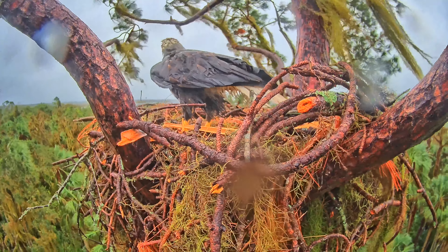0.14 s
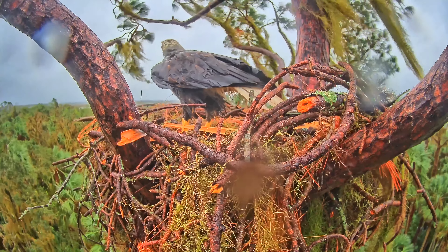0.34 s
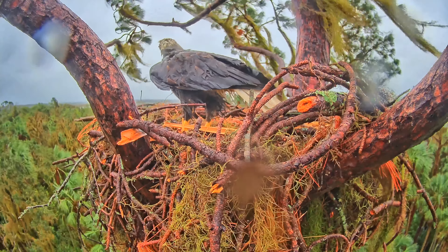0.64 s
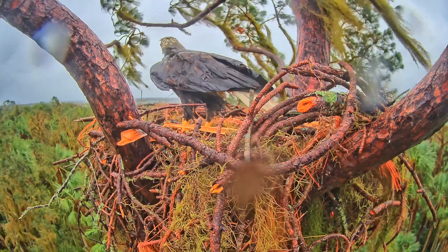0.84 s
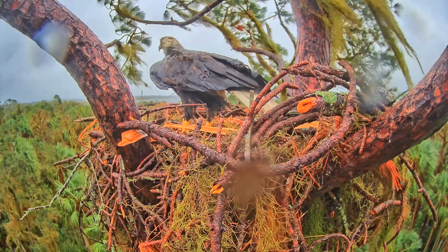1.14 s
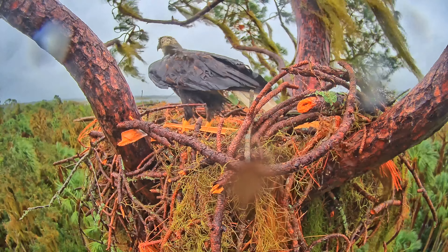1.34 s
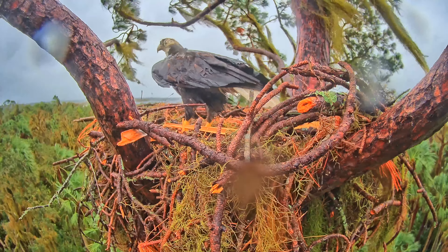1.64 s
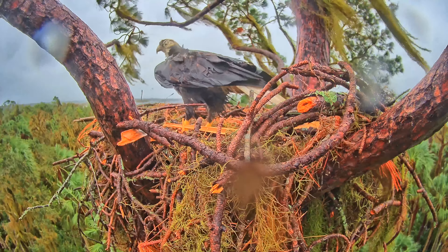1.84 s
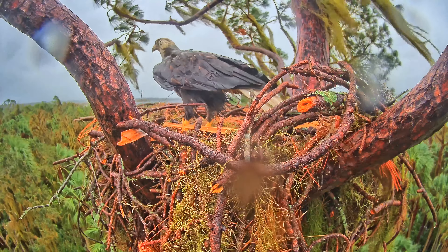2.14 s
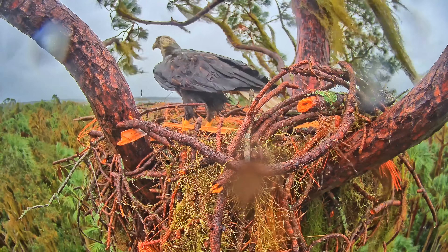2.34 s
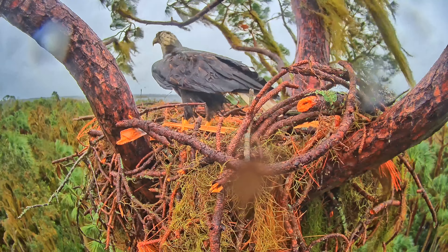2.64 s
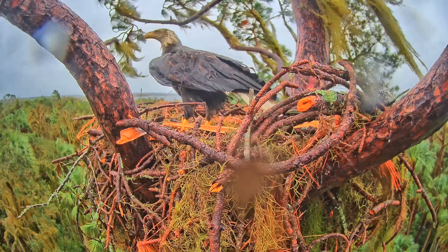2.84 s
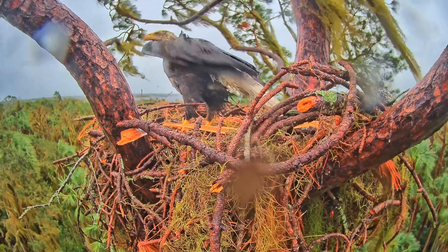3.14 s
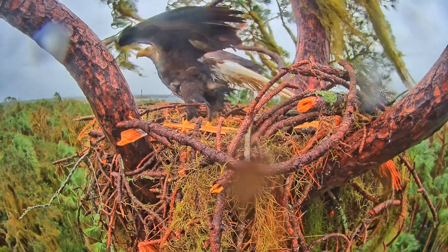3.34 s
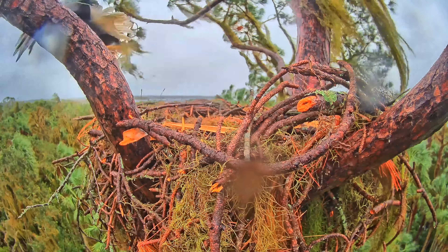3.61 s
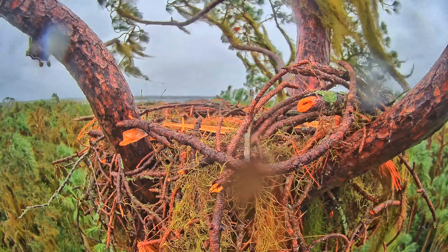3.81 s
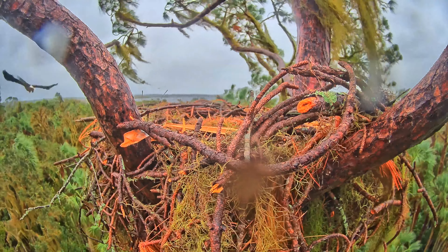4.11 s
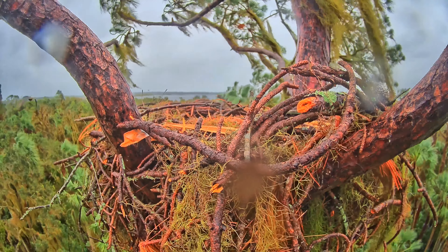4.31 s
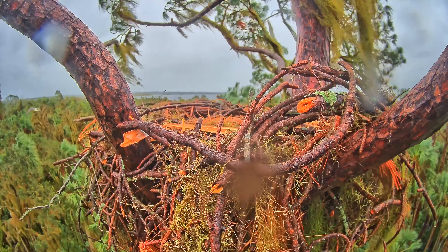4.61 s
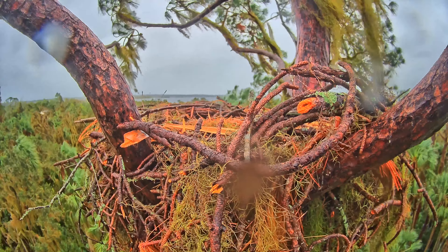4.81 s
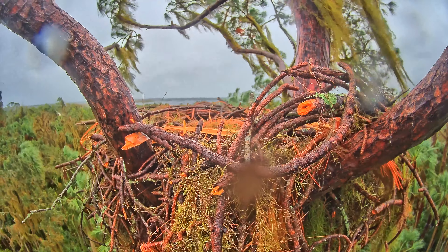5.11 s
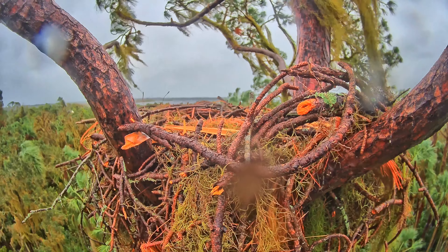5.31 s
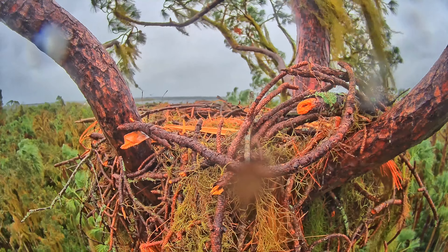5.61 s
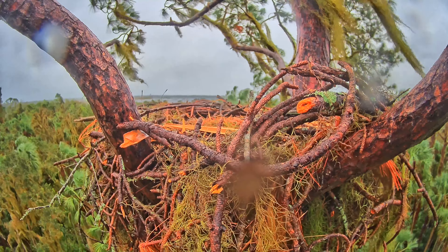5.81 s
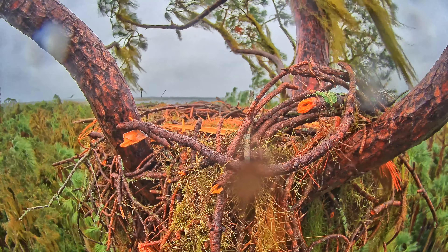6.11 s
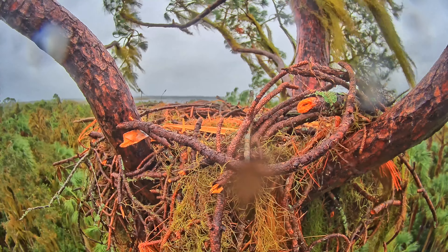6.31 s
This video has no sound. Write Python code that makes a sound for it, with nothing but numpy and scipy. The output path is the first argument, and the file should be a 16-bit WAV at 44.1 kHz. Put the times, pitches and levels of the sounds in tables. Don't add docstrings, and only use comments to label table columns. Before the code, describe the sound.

Heavy gusts buffet and crackle against a microphone high in a pine, with hollow hoots, a brief lull, and faint needle hiss behind.

```python
import sys
import numpy as np
from scipy import signal
from scipy.fft import rfft, irfft
from scipy.io import wavfile
from scipy.ndimage import uniform_filter1d

SR = 44100
rng = np.random.default_rng(int(sys.argv[2]) if len(sys.argv) > 2 else 0)


def amplitude_ratio(level_db):
    exponent = np.asarray(level_db, float) / 20
    return 10 ** exponent


def dump_mix(stems):
    frames = np.atleast_2d(stems).T
    limited = np.clip(frames, -1, 1)
    pcm = np.round(limited * 32767).astype(np.int16)
    wavfile.write(sys.argv[1], SR, pcm)


N = 284489
TIME = np.arange(N) / SR

# (time [s], hiss level [dB])
NEEDLE_SWAY = [(0, -65), (.6, -66), (.82, -62), (1.15, -64.5), (1.6, -59.5), (2.6, -62.5), (3.8, -61.5),
               (4.05, -61), (4.3, -66), (4.9, -68.5), (5.28, -59.5), (5.7, -68.5), (6.45, -69)]
# (frequency [Hz], level [dB per Hz])
NEEDLE_COLOUR = [(3000, -6), (4940, -17), (6720, -5), (8500, -12.5), (10200, -30.5), (16000, -47)]
# (time [s], bright top level [dB], body level [dB])
FEATHER_SHAKES = [
    (2.1702, -64, -61),
    (2.191, -56, -47.5),
    (2.2899, -61, -54),
    (2.333, -62, -51),
    (2.386, -68, -53),
    (2.4176, -69, -53.5),
]

# (time [s], level [dB], length [ms], pitch [Hz])
EDGE_TONES = [(0.495, -36, 14.0, 2630), (0.531, -33, 11.0, 2200), (0.804, -29, 30, 1720),
              (0.819, -23.5, 13.0, 3100), (0.82, -31, 17.0, 2540), (0.861, -24.5, 10.0, 2840),
              (1.091, -35, 29.0, 1850), (1.221, -31.5, 10.0, 2280), (1.835, -41, 12.0, 1510),
              (2.065, -39, 12.0, 2330), (2.068, -37.5, 15.0, 3400), (2.966, -33, 12.0, 1250),
              (3.096, -35.5, 30, 1590), (3.126, -34, 11.0, 2970), (3.193, -35, 17.0, 2020),
              (3.227, -36, 14.0, 1720), (3.265, -38, 30, 2670), (3.289, -32.5, 30, 2760),
              (3.304, -28, 13.0, 1250), (3.53, -37.5, 19.0, 2280), (3.65, -31.5, 14.0, 990),
              (3.762, -30.5, 19.0, 2840), (3.934, -36, 30, 2800), (3.961, -33, 15.0, 1120),
              (4.016, -42, 20.0, 1340), (4.017, -24.5, 17.0, 2890), (4.061, -28.5, 20, 2934),
              (4.312, -42, 21.0, 2760), (4.345, -29, 13.0, 1080), (4.449, -38.5, 30, 2930),
              (4.564, -32.5, 15.0, 1770), (4.56, -28.5, 12.0, 3010), (5.063, -39, 10.0, 1160),
              (5.332, -42.5, 17.0, 2800), (5.373, -31, 20, 303), (5.407, -38.5, 13.0, 2760),
              (5.5, -43, 15.0, 2630), (5.739, -38, 10.0, 1160), (6.369, -41, 11.0, 2330)]
EDGE_WANDER = 0.0477
# (time [s], level [dB])
CRACKS = [(0.0215, -35), (.057, -54), (.081, -48), (.138, -56), (.242, -57), (.475, -54), (0.662, -42),
          (0.697, -47), (0.755, -40), (.832, -41), (.943, -57), (1.003, -45), (1.072, -53), (1.099, -51.5),
          (3.264, -46), (3.976, -47), (4.004, -49), (4.03, -47), (4.048, -54), (4.297, -48), (4.459, -54),
          (4.602, -59), (4.685, -56), (4.756, -60)]
# (frequency [Hz], level [dB per Hz])
CRACK_COLOUR = [(1500, -4), (3000, 13.5), (6000, -17), (11000, -5), (16500, -20)]
CRACK_MS = 2

# (time [s], level [dB], length [ms])
HOOTS = [(0.034, -15, 4.9), (0.216, -13.5, 5.7), (3.251, -23.5, 19), (0.729, -25, 7.6), (0.861, -18, 7.5),
         (1.255, -23, 8.2), (1.427, -27, 6), (1.628, -25, 16), (5.271, -31.5, 11), (5.508, -30.5, 7.5),
         (3.365, -23, 5.6), (2.451, -25.5, 8.5), (3.014, -18, 8.3), (3.055, -24.5, 17), (3.329, -16.5, 5.2),
         (3.388, -29, 7.8), (3.58, -23.5, 13), (3.934, -19, 13), (4.005, -24.5, 25), (4.309, -18, 16),
         (4.471, -26, 10), (3.161, -31, 8.2), (4.675, -25, 9.1), (4.751, -22, 4.4), (3.097, -32, 7.3),
         (5.624, -30.5, 6.7), (5.702, -26.5, 12), (5.796, -33, 38), (6.135, -37.5, 46), (6.261, -25.5, 11),
         (6.301, -24.5, 8.2), (6.429, -24, 15.5)]
CAVITY_HZ, CAVITY_WIDTH_HZ = 616, 80
HUM_DB, HUM_FOLLOWS, HUM_PER_WHISTLE = -51, 0.97, -0.24
HOOT_STIR_DB, HOOT_JET_DB = -17, -23.5

# (time [s], level [dB], length [ms])
TUMBLES = [(0.022, -17.5, 30), (0.084, -17, 13), (0.108, -27, 9), (0.13, -34, 11), (0.217, -14, 23),
           (0.474, -21, 15), (0.535, -28, 9.8), (0.568, -28, 31), (0.763, -33, 26), (0.906, -23, 21),
           (1.372, -34, 6.8), (1.858, -34, 12), (1.893, -31, 12), (1.939, -29, 8.3), (1.969, -30, 20),
           (2.058, -25.5, 12), (2.355, -31, 13), (2.451, -27, 10), (2.701, -21.5, 14), (3.049, -23, 25),
           (3.505, -26, 9), (3.639, -24.5, 15), (3.778, -23, 13), (4.014, -31, 21), (4.297, -13.5, 10),
           (4.407, -27, 13), (4.678, -22.5, 17), (4.758, -24, 29), (4.82, -34, 7.4), (5.03, -30, 8.2),
           (5.404, -36, 11), (5.662, -20.5, 14), (5.818, -22.5, 19)]
# (frequency [Hz], level [dB per Hz])
ROAR_COLOUR = [(90, -33), (180, -2), (330, 0), (470, -4.5), (700, -13), (1200, -22)]
ROAR_DB, ROAR_PER_PUSH, ROAR_PER_JET, ROAR_PER_SHARPNESS = -42, 0.68, 0.077, 0.062
ROAR_FULL_DB = -24
CALM_PUSH_DB, CALM_JET_DB, CALM_SHARPNESS_DB = -30, -45, -22

# (time [s], jet level [dB], whistle above throat [dB], sharpness of the edge flow [dB])
WIND = [(0, -33, -1, 9), (.12, -31.5, -13.5, -65), (.28, -43.5, -12, 0), (.44, -44, -12, -25),
        (.56, -38, -3, -8.5), (.82, -32, 0.5, -0.5), (1.15, -37.5, 0.5, -9.5), (1.4, -52.5, -0.5, -43),
        (2.25, -60, 13.5, -0.5), (2.75, -47, -14.5, -20), (3.0, -41, -4.5, -39), (3.24, -28.5, -6.5, -18),
        (3.45, -38, -5, -34), (3.95, -41, 5.5, -16), (4.4, -37.5, -3, -15), (4.75, -52, -3, -1.5),
        (5.2, -58.5, -9.5, -24), (6.45, -48, -10, -42)]
# (time [s], level [dB], length [ms], whistle above throat [dB])
PUFFS = [(.071, -27.5, 97, -2.5), (0.226, -31.5, 19.5, -19), (0.488, -32.5, 38, 10), (0.531, -28, 19, 14),
         (0.629, -28, 11.4, -13), (0.735, -37.5, 35, 25), (0.804, -31.5, 122, 24), (1.03, -34.5, 49, 8),
         (1.09, -31.5, 17, -15), (1.225, -25.5, 12, 6), (1.635, -43, 63, -11), (1.833, -41.5, 61, -3),
         (2.068, -36.5, 45, -2), (2.951, -33, 23, -10.5), (3.267, -28.5, 29, 1), (3.307, -29.5, 10, -5),
         (3.51, -38, 48, -22), (3.77, -22.5, 37.6, -1), (3.895, -36, 12, 44), (3.949, -25, 52, -2),
         (4.019, -23, 37, 4), (4.057, -39.5, 44, 52), (4.308, -24.5, 26.4, 1), (4.351, -27, 29, -8),
         (4.446, -42, 17, -25), (5.401, -37, 19, -9), (5.498, -40.5, 36, -4), (5.816, -44, 40, -17),
         (6.138, -46.5, 39, -14), (6.43, -39, 18, 6)]
# (time [s], level [dB], length [ms], whistle above throat [dB])
SPITS = [(.022, -18.5, 8.5, -11), (.139, -43, 8, 0), (0.2, -34, 15, 4), (0.676, -31, 8.4, 7),
         (0.702, -24, 5.4, 22), (0.778, -21, 7.7, -2), (0.844, -15.5, 3.7, 16), (0.862, -22, 12.6, 7),
         (0.912, -27, 1.5, 19), (0.998, -42, 25, 0), (1.374, -42, 8.5, -6), (2.868, -42.5, 3.2, 27),
         (3.16, -34, 16, -8), (3.191, -29.5, 10, -24), (3.785, -15, 4, -17), (4.185, -39, 24, 24),
         (4.47, -35.5, 8.2, 31), (4.556, -35, 15, 17), (4.634, -35, 3.3, -8), (4.677, -34.5, 14.7, 4),
         (4.744, -38, 3.3, -35), (4.766, -19, 3.4, 2), (4.847, -36.5, 9.4, 14), (4.912, -37, 14, -4),
         (5.063, -29.5, 2.3, -16), (5.283, -48, 46, 28), (5.34, -31.5, 5.5, -11.5), (5.625, -42, 8.6, -27),
         (5.665, -35.5, 3.7, -12), (6.37, -35, 7.4, -10)]
# (time [s], level [dB], length [ms])
WISPS = [(.054, -34.5, 58), (0.79, -35, 4.3), (.889, -41, 23), (.947, -33, 6.7), (0.962, -24, 2),
         (1.138, -43, 30), (1.257, -42.5, 34), (1.455, -48.5, 36), (3.125, -36, 38), (3.328, -40, 15),
         (4.597, -46, 10), (4.754, -28, 1.4), (4.819, -36, 3), (4.998, -37, 3.4), (5.156, -37, 6.5),
         (5.561, -37, 10), (5.705, -51, 22), (5.961, -50, 34), (6.303, -46, 4.5)]
# (frequency [Hz], level [dB per Hz])
THROAT_COLOUR = [(300, 6), (520, -3), (760, -2), (1080, 0), (1700, -7.5), (2400, -18.5), (3500, -65)]
# (frequency [Hz], level [dB per Hz])
WHISTLE_COLOUR = [(1200, 3), (1900, 1), (2400, 2), (2880, 6), (3400, -3), (4200, -11.5), (6000, -32)]
# (frequency [Hz], level [dB per Hz])
FIZZ_COLOUR = [(3000, -13), (4500, -2.5), (6640, -5.5), (10000, -21), (16000, -35)]
FIZZ_DB, FIZZ_PER_WHISTLE, FIZZ_PER_LEVEL = -1, 0.022, -0.058
SPIT_FIZZ_DB, USUAL_PUFF_DB = -5, -32

# (time [s], level [dB])
PUSH = [(0, -28.5), (.38, -32.5), (.58, -21), (1.15, -21.5), (1.45, -37.5), (1.75, -32.5), (1.88, -28),
        (2.17, -28.5), (2.27, -52), (2.62, -36), (3.3, -28.5), (3.7, -27.5), (4.38, -22.5), (4.75, -21),
        (5.07, -20), (5.2, -41), (5.95, -33), (6.2, -32.5)]
# (frequency [Hz], level [dB per Hz])
BUFFET_COLOUR = [(8, 3.5), (27, -5.5), (42, -3.5), (148, -10.5), (260, -24), (600, -41.5)]
# (time [s], peak [dB], length [ms])
THUMPS = [(0.053, -2.5, 4.3), (1.107, -13, 7.7), (1.811, -10, 15), (1.734, -18.5, 6), (2.491, -18.5, 3.9),
          (2.706, -26, 4.3), (2.983, -10.5, 12), (3.27, -8.5, 12), (3.38, -4.5, 5.3), (4.028, -5, 12),
          (4.776, -6.5, 2.6), (5.405, -15, 8.8)]
# (time [s], peak [dB], length [ms])
TUGS = [(0.024, -9, 4.2), (0.552, -5, 7), (0.71, -5.5, 26), (0.937, -6, 14), (1.333, -3.5, 6.9),
        (2.322, -20.5, 15), (1.48, -17, 10.6), (1.742, -19, 8.6), (1.88, -7, 1.8), (2.105, -8.5, 7.9),
        (2.36, -14, 11.6), (3.739, -7.5, 14), (3.89, -11.5, 6.9), (4.341, -6, 23), (4.765, -5.5, 4),
        (4.822, -9, 15), (5.38, -3, 11), (5.492, -7.5, 6), (5.667, -13.5, 11.5), (5.182, -12.5, 10.6)]
# (time [s], peak [dB], length [ms])
ROLLS = [(0.569, -9, 3), (.604, -24, 20), (0.648, -10, 6.5), (0.695, -14, 21), (.724, -14, 5.9),
         (.764, -23, 8.6), (0.836, -13, 19), (0.9, -12, 19), (0.959, -10.5, 14), (1.01, -9.5, 16),
         (1.037, -9, 9.7), (1.156, -14, 12), (1.353, -19, 6.5), (2.041, -18, 5), (2.12, -14, 8),
         (3.293, -10, 6.9), (3.352, -13, 15), (3.474, -13, 15), (3.857, -10.5, 7.8), (3.869, -8.5, 11),
         (4.143, -14, 22), (4.194, -15, 17), (4.262, -12, 15), (4.352, -13, 27), (4.432, -13, 24),
         (4.488, -7, 20), (4.526, -8, 11), (4.646, -16, 21), (4.742, -10, 6), (4.831, -11, 18),
         (4.861, -23, 18), (4.892, -11, 27), (4.953, -21, 15), (4.997, -16, 12), (5.055, -16, 23),
         (5.078, -12, 15), (5.108, -10, 9.1)]
# (time [s], peak [dB], length [ms])
TROUGHS = [(0.013, -18, 4.9), (.623, -18, 9.4), (0.664, -13, 50), (0.758, -5, 6.4), (.77, -10, 8.4),
           (0.822, -10, 15), (0.98, -12, 18), (1.026, -17, 12), (1.123, -12.5, 13), (1.244, -15, 16),
           (2.024, -11, 24), (2.053, -11, 11), (3.206, -11.5, 22), (3.287, -11.5, 30), (3.344, -10, 8.1),
           (3.422, -15.5, 9.2), (3.496, -11, 4.5), (3.686, -11.5, 17), (3.798, -10, 13), (3.95, -7, 9.7),
           (3.997, -12, 9.8), (4.036, -9, 34), (4.088, -17, 15), (4.178, -12.5, 13), (4.292, -14, 16),
           (4.401, -9.5, 12), (4.482, -7.5, 7.2), (4.513, -6, 20), (4.543, -8.5, 8.4), (4.583, -5.5, 14),
           (4.632, -12, 13), (4.658, -11, 16), (4.697, -7.5, 17), (4.753, -11, 9.8), (4.792, -7.5, 17),
           (4.84, -7.5, 12), (4.871, -8, 24), (4.907, -7.5, 10.3), (4.973, -16.5, 13), (5.035, -19, 11),
           (5.094, -11, 15)]
ORDERLY = 2.4
# (start [s], length [ms])
BLANKS = [(0.17, 7), (0.54, 12.6), (.558, 3), (0.686, 7.6), (0.741, 11), (0.898, 4), (0.93, 4.1),
          (0.965, 15.5), (1.194, 20), (1.388, 13), (1.985, 4.3), (2.011, 12), (2.033, 7.3), (2.109, 4.6),
          (2.88, 6), (2.906, 11), (2.986, 5.7), (3.438, 20), (3.862, 3.7), (4.512, 6.3), (4.608, 4.8),
          (4.635, 6.1), (4.65, 8.3), (4.902, 6.3), (5.012, 4.9), (5.049, 7.2), (5.096, 7.6), (5.162, 21)]
# (start [s], length [ms])
STALLS = [
    (2.095, 6.5),
    (4.571, 12),
    (4.688, 13),
    (4.785, 4),
    (4.831, 8.5),
    (4.877, 6.1),
    (4.922, 5.8),
    (5.022, 7.3),
]
BLANK_DB, QUICK_BLANK_DB_MS = -27, -71
PIN_PUSH_DB, PIN_WIDTH = 7.5, 1.95
PATCH_LIMIT_DB = 5


def evened(x):
    return x / np.sqrt(np.mean(x ** 2) + 1e-20)


def curve(table, column):
    rows = np.array(table)
    return np.interp(TIME, rows[:, 0], rows[:, column])


def flicker(top_hz):
    hz = np.fft.rfftfreq(N, 1 / SR)
    shape = np.exp(-(hz / top_hz) ** 2) * (hz > 3) / np.sqrt(hz + 10)
    return evened(irfft(rfft(rng.standard_normal(N)) * shape, N))


def noise(points, patchy_db, size=512):
    frames = 4 * N // size + 5
    hz = np.fft.rfftfreq(size, 1 / SR)
    a, b, patches = rng.standard_normal((frames, len(hz), 3)).T
    patches = uniform_filter1d(patches, size=4, axis=0)
    patches = evened(uniform_filter1d(patches, size=5, axis=1))
    f, level_db = np.transpose(points)
    colour_db = np.interp(np.log(hz + 1), np.log(f + 1), level_db, left=-90, right=-90)
    drift_db = min(patchy_db, PATCH_LIMIT_DB) * patches
    z = (a + 1j * b) * amplitude_ratio(colour_db[:, None] + drift_db)
    return evened(signal.istft(z, nperseg=size, noverlap=size - size // 4)[1][:N])


def nearby(s, ms):
    return slice(max(int((s - ms / 400) * SR), 0), int((s + ms / 400) * SR))


def humps(seconds, heights, lengths_ms, order=2):
    out = np.zeros(N)
    for s, height, ms in zip(seconds, heights, lengths_ms):
        near = nearby(s, ms)
        from_middle = abs(TIME[near] - s) * 2000 / max(ms, 2)
        out[near] += height * .5 ** from_middle ** order
    return out


def signed(pushes, pulls):
    s, peak_db, ms = np.transpose(pushes + pulls)
    return s, amplitude_ratio(peak_db) * np.repeat([1, -1], [len(pushes), len(pulls)]), ms


def distance():
    colour = [(600, -11), (2000, -3.0), (4200, -10.5), (5000, -58), (10000, -34.5), (15500, -26)]
    return amplitude_ratio(-63.0) * noise(colour, patchy_db=8.0)


def tree():
    s, top_db, body_db = np.transpose(FEATHER_SHAKES)
    top_swell = humps(s + .006, amplitude_ratio(top_db), 14.0 + 0 * s)
    top = top_swell * noise([(11000, -32), (14000, 2), (16500, -17)], patchy_db=5)
    body = humps(s + 0.0043, amplitude_ratio(body_db), 13.0 + 0 * s)
    hiss = amplitude_ratio(curve(NEEDLE_SWAY, column=1) + 2.6 * flicker(top_hz=90))
    return (hiss + body) * noise(NEEDLE_COLOUR, patchy_db=7) + top


def edge_tones():
    waver = evened(uniform_filter1d(rng.standard_normal((2, N)), size=70, axis=1))
    out = np.zeros(N)
    for s, level_db, ms, hz in EDGE_TONES:
        near = nearby(s, ms)
        turns = np.cumsum(hz * (1 + EDGE_WANDER * waver[0, near])) / SR
        swell = .5 ** ((TIME[near] - s) * 2000 / max(ms, 3)) ** 2
        out[near] += amplitude_ratio(level_db + 3.1 * waver[1, near]) * swell * np.sin(2 * np.pi * turns)
    return out


def cracks():
    s, level_db = np.transpose(CRACKS)
    snaps = humps(s, amplitude_ratio(level_db + 12.5), CRACK_MS + 0 * s)
    return snaps * noise(CRACK_COLOUR, patchy_db=-2, size=256)


def cavity(lumps):
    s, level_db, ms = np.transpose(HOOTS)
    hum_db = HUM_DB + HUM_FOLLOWS * (curve(WIND, column=1) - CALM_JET_DB)
    steady = amplitude_ratio(hum_db + HUM_PER_WHISTLE * curve(WIND, column=2))
    throb = flicker(top_hz=60)
    hum = steady * amplitude_ratio(2 * lumps + 3 * throb)
    drive = hum + humps(s, amplitude_ratio(level_db - 6.0), 1.24 * ms) * amplitude_ratio(0.43 * throb)
    turn = np.exp(2j * np.pi * CAVITY_HZ * TIME)
    r = np.exp(-np.pi * CAVITY_WIDTH_HZ / SR)
    ring = signal.lfilter([1], np.convolve([1, -r], [1, -r]), rng.standard_normal(N) / turn)
    return drive * evened((turn * ring / (abs(ring) + 1e-9) ** 0.32).real)


def roar(lumps, eddies):
    stir_db = ROAR_PER_PUSH * (np.minimum(curve(PUSH, column=1), ROAR_FULL_DB) - CALM_PUSH_DB)
    stir_db = stir_db + ROAR_PER_JET * (curve(WIND, column=1) - CALM_JET_DB)
    stir_db = stir_db + ROAR_PER_SHARPNESS * (curve(WIND, column=3) - CALM_SHARPNESS_DB)
    level = amplitude_ratio(ROAR_DB + stir_db) * evened(amplitude_ratio(5.8 * np.tanh(1.65 * lumps)))
    level = level + 0.042 * uniform_filter1d(abs(eddies), size=300)
    s, level_db, ms = np.transpose(HOOTS)
    level = level + humps(s, amplitude_ratio(level_db + HOOT_STIR_DB), 0.45 * ms)
    s, level_db, ms = np.transpose(TUMBLES)
    level = level + humps(s, amplitude_ratio(level_db - 8.0), 0.82 * ms)
    tumbling = noise(ROAR_COLOUR, patchy_db=3.0, size=1024)
    return level * evened(tumbling / uniform_filter1d(tumbling ** 2, size=1200) ** 0.28)


def jet():
    wisps = [(*row, np.interp(row[0], TIME, curve(WIND, column=2))) for row in WISPS]
    s, level_db, ms, bright_db = np.transpose(PUFFS + SPITS + wisps)
    spit = np.isin(s, np.transpose(SPITS)[0])
    fizz_db = FIZZ_DB + np.interp(s, TIME, curve(WIND, column=3))
    fizz_db = fizz_db + FIZZ_PER_WHISTLE * bright_db + SPIT_FIZZ_DB * spit
    fizz_db = fizz_db + FIZZ_PER_LEVEL * (level_db - USUAL_PUFF_DB)

    flutter = flicker(top_hz=352)
    coarse = evened(uniform_filter1d(flutter, size=250) - uniform_filter1d(flutter, size=1500))
    stream = amplitude_ratio(curve(WIND, column=1) + 0.5 * flicker(top_hz=60))
    bright = amplitude_ratio(curve(WIND, column=2) / 2)
    throat = stream / bright + humps(s, amplitude_ratio(level_db - bright_db / 2), ms)
    hoot_s, hoot_db, hoot_ms = np.transpose(HOOTS)
    throat = throat + humps(hoot_s, amplitude_ratio(hoot_db + HOOT_JET_DB), 2.0 * hoot_ms)
    whistle = stream * bright + humps(s + 0.0002, amplitude_ratio(level_db + 0.26 * bright_db), ms)
    fizz = amplitude_ratio(-22.5) * stream * bright + humps(s, amplitude_ratio(level_db + fizz_db), 1.05 * ms)

    snaps = (rng.random(N) < 500 / SR) * amplitude_ratio(1.4 * np.minimum(rng.exponential(1, N), 4))
    crackle = evened(amplitude_ratio(5.0 * flutter) * (1 + uniform_filter1d(snaps, size=20) * 25))
    crackle = 7 * np.tanh(crackle / 7)
    sizzle = noise(FIZZ_COLOUR, patchy_db=8.5, size=256)
    top = signal.sosfilt(signal.butter(2, 9000, "high", fs=SR, output="sos"), sizzle)
    sizzle = sizzle - top * np.exp(-(fizz * crackle / amplitude_ratio(-61.0)) ** 2)

    body = throat * noise(THROAT_COLOUR, patchy_db=3.5, size=256)
    body = body + whistle * noise(WHISTLE_COLOUR, patchy_db=6.0, size=256)
    torn = evened(amplitude_ratio(2.26 * flutter + 1.07 * coarse))
    return amplitude_ratio(-4.5) * torn * body + fizz * crackle * sizzle


def buffeting(lumps):
    push_db = curve(PUSH, column=1)
    s, height, ms = signed(THUMPS, TUGS)
    eddies = humps(s, height, 0.77 * ms)
    s, height, ms = signed(ROLLS, TROUGHS)
    rolls = humps(s, amplitude_ratio(-2.5) * height, 0.5 * ms)
    busy = uniform_filter1d(abs(rolls), size=4000) / amplitude_ratio(push_db)
    s, ms = np.transpose(BLANKS)
    pins = amplitude_ratio(PIN_PUSH_DB + push_db) * humps(s + ms / 2000, 1 + 0 * s, PIN_WIDTH * ms)

    swings = noise(BUFFET_COLOUR, patchy_db=-2.0, size=4096)
    ripple = swings - uniform_filter1d(swings, size=420)
    ripple_power = uniform_filter1d(ripple ** 2, size=1500) / np.mean(ripple ** 2)
    swings = swings - ripple * np.tanh(ripple_power / 2.2)
    swings = evened(swings / (uniform_filter1d(swings ** 2, size=3000) + 0.044) ** 1.09)
    swings = amplitude_ratio(-7.0 + push_db) * evened(amplitude_ratio(1.3 * np.tanh(lumps))) * swings
    loose = 0.64 * np.tanh(swings / 0.19) / (1 + ORDERLY * busy)
    return loose + pins / (1 + 1.1 * busy) + rolls + amplitude_ratio(-3.0) * eddies, eddies


def scene():
    s, ms = np.transpose(BLANKS + STALLS)
    pinned_db = humps(s + ms / 2000, BLANK_DB + QUICK_BLANK_DB_MS / ms, 0.95 * ms, order=4)
    pinned_db = np.maximum(pinned_db, -17)
    lumps = flicker(top_hz=43)
    lumps = evened(lumps - uniform_filter1d(lumps, size=6000))
    low, eddies = buffeting(lumps)
    squeeze_db = -14 * uniform_filter1d(abs(low), size=100)
    treble = amplitude_ratio(pinned_db) * jet() + amplitude_ratio(.45 * pinned_db) * tree()
    housing = amplitude_ratio(.6 * pinned_db) * (cavity(lumps) + roar(lumps, eddies))
    far = amplitude_ratio(.3 * pinned_db) * distance()
    return (low + amplitude_ratio(squeeze_db) * treble + housing + far + edge_tones() + cracks())[None]


def band_limit(x):
    return signal.sosfilt(signal.butter(12, 16500, fs=SR, output="sos"), x)


def record(dry):
    edge = signal.firwin(767, 15800, window=("kaiser", 8), fs=SR)[None]
    coupled = signal.sosfilt(signal.butter(1, 4, "high", fs=SR, output="sos"), dry)
    overloaded = 0.55 * np.tanh(coupled / 0.57)
    return band_limit(signal.oaconvolve(overloaded, edge, "same"))


dry = scene()
out = record(dry)
dump_mix(out)
```